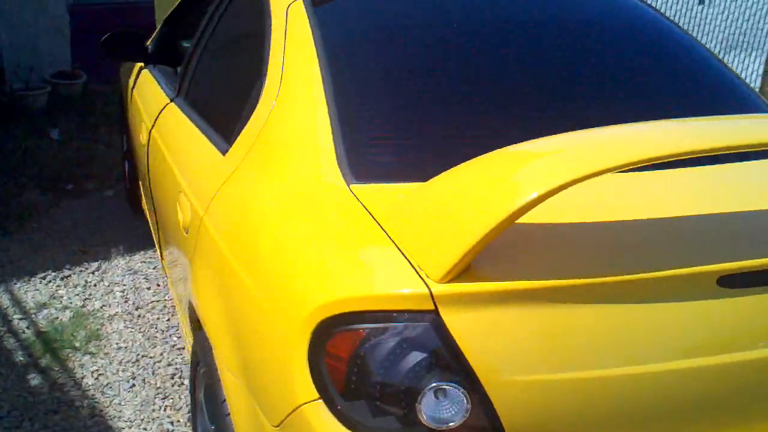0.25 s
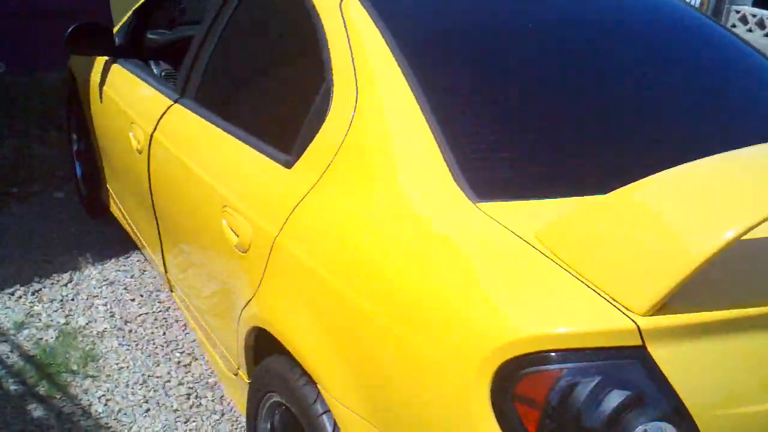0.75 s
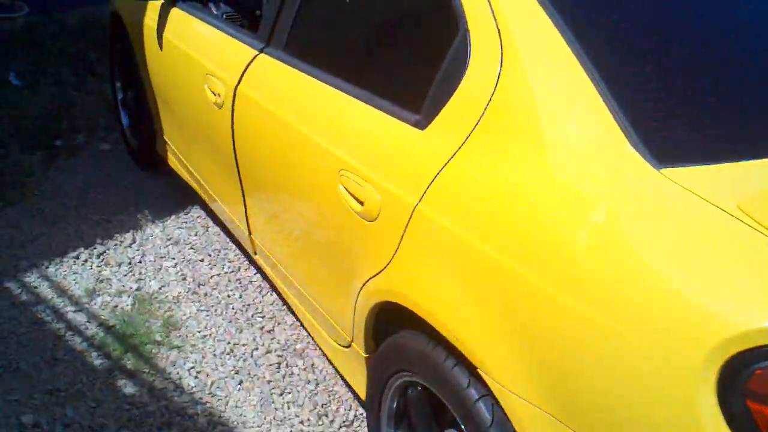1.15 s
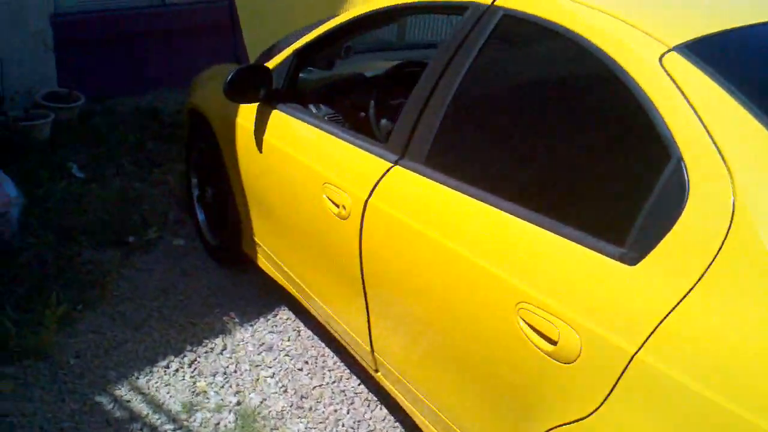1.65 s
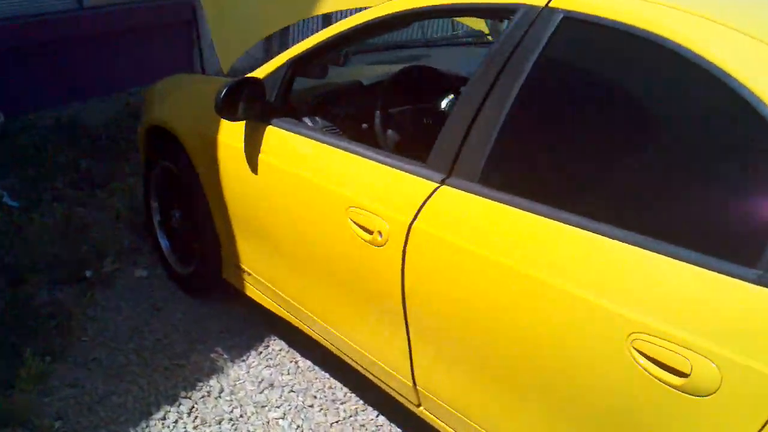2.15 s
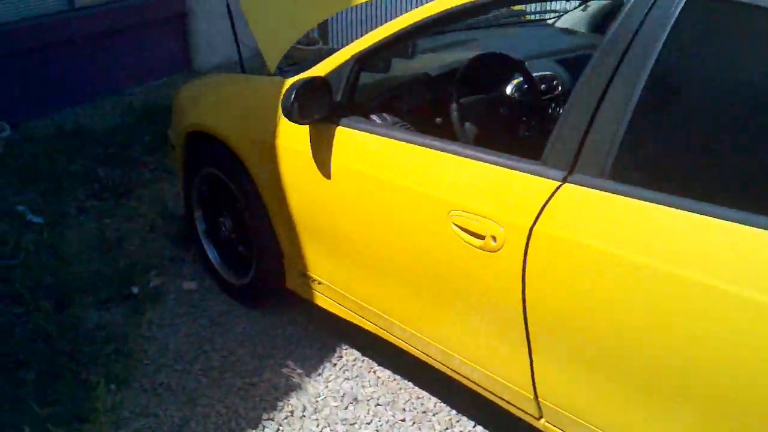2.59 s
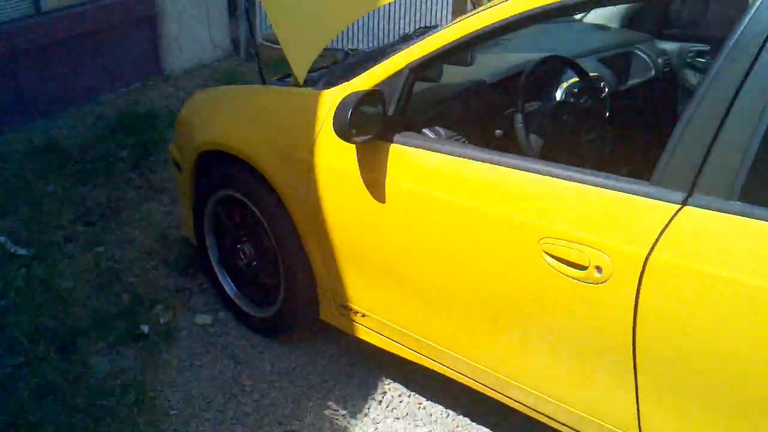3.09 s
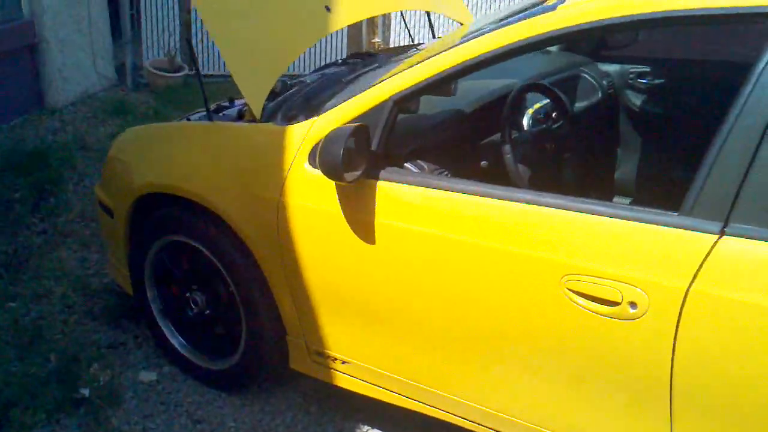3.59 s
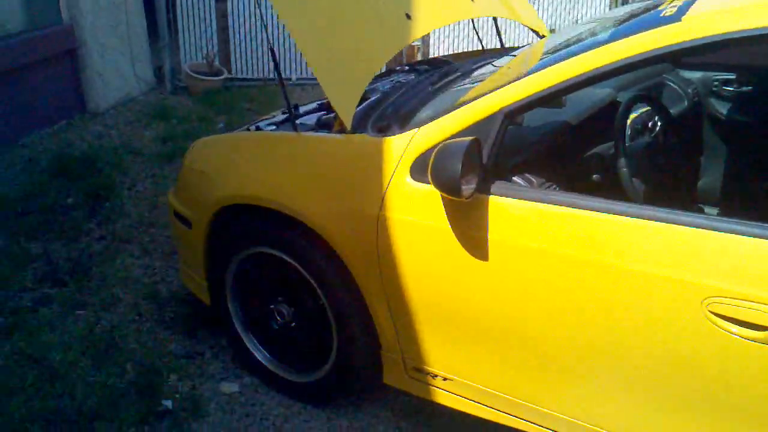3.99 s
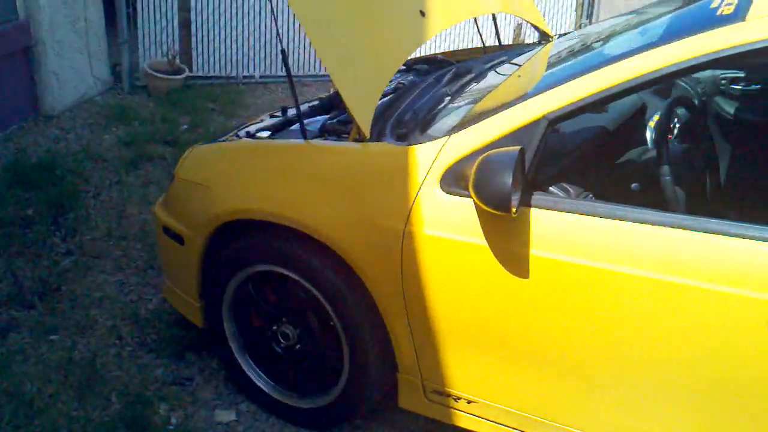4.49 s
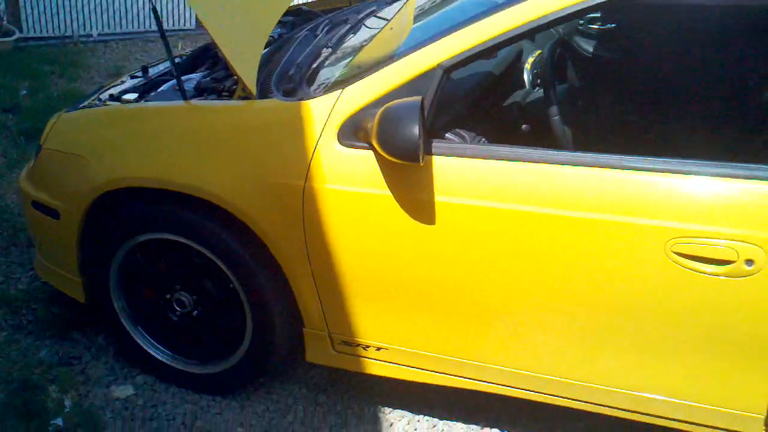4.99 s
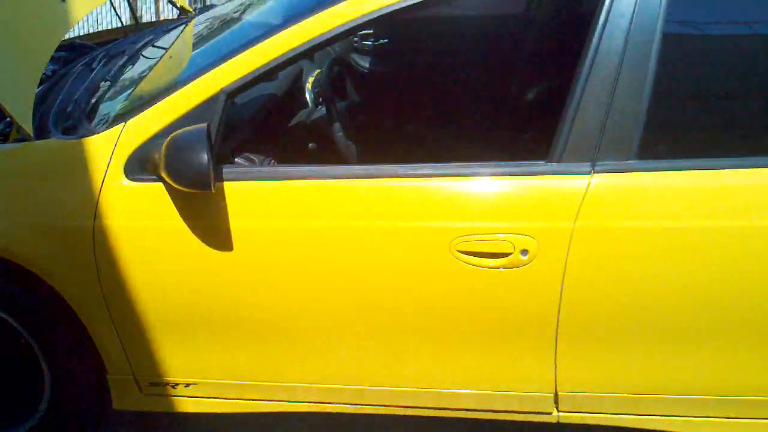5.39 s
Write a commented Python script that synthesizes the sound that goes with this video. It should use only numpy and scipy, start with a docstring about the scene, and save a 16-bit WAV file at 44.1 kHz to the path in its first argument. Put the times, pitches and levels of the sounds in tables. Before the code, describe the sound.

A turbocharged four-cylinder car idles outdoors for about 5.6 seconds, already running at the start and cut off while running. The idle lopes: around thirty quick firings a second, grouped in eights, weaken and then build to a heavy chug about every 0.27 seconds. From 0 to 1 second the microphone is behind the car, with boomy low thumps, hollow barks, raspy puffs and small hooting burbles near 0.2 and 0.5. From 1 to 2.5 seconds it moves along the side; the boom thins and hiss rises. After about 2.3 seconds the chugs gain blunt pressure snaps, strongest near 3.1, while the rasp drops away. Around 4.2 the engine bay hiss is strongest, bright and flickering with ticks and spits. From 4.6 faint burbles return, and near 5 the rasp is almost gone as the view turns partly back. Close, wide stereo with short reflections from ground and wall.

```python
"""A four-cylinder turbo engine idles with a lope: firings build up to a loud chug every eighth beat.
Each firing rings exhaust resonances with a pressure pulse and a puff of gas noise, followed by echoes.
The listener goes from behind the car towards its side, then partly back; rasp fades, engine bay hiss grows.
Ticks, spits, gas crackle, tonal burbles and pressure snaps join in.
Two close microphone ports are cross-fed through a short delay to widen the picture."""
import sys
import numpy as np
from scipy import signal
from scipy.fft import rfft, irfft, next_fast_len
from scipy.io import wavfile

SR = 44100
rng = np.random.default_rng(int(sys.argv[2]) if len(sys.argv) > 2 else 0)


def pcm_store(signal):
    """Save signal as 16-bit PCM."""
    levels = np.round(np.clip(np.atleast_2d(signal), -1, 1) * 32767)
    wavfile.write(sys.argv[1], SR, levels.astype(np.int16).T)


N = 249165

# onsets of the eight beats from chug to chug, closest around the chug: [share of the lope]
BEATS = [0, .1217, .2455, .372, .4995, .627, .7544, .8787]


def from_db(db):
    """Decibels to gain."""
    return 10 ** (np.asarray(db) / 20)


def rms_one(x):
    """Scales all rows so that the first has rms 1."""
    return x / np.sqrt(np.mean(x[0] ** 2) + 1e-20)


def in_time(rows):
    """Second column of a curve at every sample."""
    return np.interp(np.arange(N) / SR, *np.transpose(rows))


def clicks(s, sizes):
    """A click of each size at each time that falls inside the scene."""
    at = np.round(s * SR).astype(int)
    inside = (at >= 0) & (at < N)
    return np.bincount(at[inside], sizes[inside], N)


def grains(per_s, spread_db):
    """Clicks at random moments, most small, a few large."""
    sizes = from_db(spread_db * np.minimum(rng.exponential(1, N), 4))
    return sizes * (rng.random(N) < per_s / SR)


def dying(impulses, decay_s):
    """Each click adds an exponentially dying envelope that starts at the click's size."""
    return signal.lfilter([1], [1, -np.exp(-1 / (decay_s * SR))], impulses + 1e-18)


def resonance(x, hz, width_hz):
    """Two-pole peak applied twice, so that its skirts stay dark; gain 1 on top."""
    r = np.exp(-np.pi * width_hz / SR)
    g = (1 - r * r) / 2
    section = [g, 0, -g, 1, -2 * r * np.cos(2 * np.pi * hz / SR), r * r]
    return signal.sosfilt([section] * 2, x)


def coloured_noise(colour):
    """A pair of unrelated noises, coloured by the first and last level columns."""
    hz, colour = np.fft.rfftfreq(N, 1 / SR) + 1, np.array(colour)
    log_hz, log_points = np.log(hz), np.log(colour[:, 0])
    shape_db = [np.interp(log_hz, log_points, colour[:, c], left=-60) for c in (1, -1)]
    spectrum = rfft(rng.standard_normal((2, N))) * from_db(shape_db)
    return rms_one(irfft(spectrum, N))


def hiss_db(s):
    """The hiss swells with each lope and flares now and then, rising faster than it fades."""
    # engine bay hiss along the walk: [t/s, level/dB]
    bay_walk = [(0, -57.5), (0.9, -57.5), (1.5, -55), (2.3, -53.5), (2.8, -54), (3.5, -54.5), (4.2, -52),
                (4.8, -53.5), (5.65, -53)]
    # brief changes of hiss level, mostly up: [peak t/s, change/dB, fall length/s]
    flare_table = [(0.12, 8, 0.013), (0.388, 9.5, 0.011), (0.514, 6, 0.013), (0.61, 4, 0.022),
                   (0.692, 7.5, 0.012), (0.973, 6.5, 0.011), (1.167, 2.5, 0.062), (1.628, 4.5, 0.013),
                   (1.835, 6.5, 0.0076), (1.975, 2.5, 0.012), (2.478, 5.5, 0.016), (2.784, -1, 0.018),
                   (3.176, 2.5, 0.028), (3.591, 6.5, 0.015), (3.754, 3, 0.015), (3.825, 2.5, 0.018),
                   (3.928, 4, 0.027), (4.12, 3.5, 0.026), (4.268, 4, 0.017), (4.398, 6, 0.029),
                   (4.59, 2, 0.035), (4.658, 5, 0.027), (4.913, 3.5, 0.016), (5.499, 6, 0.0073)]
    swing_db, lead_lopes, rise_share = 1, 0.11, 0.38
    t = np.arange(N) / SR
    lopes = np.interp(t, s, np.arange(len(s)) / len(BEATS))
    flares_db = 0
    for top_s, change_db, fall_s in flare_table:
        length_s = np.where(t < top_s, rise_share * fall_s, fall_s)
        flares_db = flares_db + change_db * np.exp(-((t - top_s) / length_s) ** 2)
    # the swell peaks ahead of the chug
    swell_db = swing_db * np.cos(2 * np.pi * (lopes + lead_lopes))
    return in_time(bay_walk) + swell_db + flares_db


def hiss(s, rasp_db):
    """Bright noise whose bands flicker apart, loose valve gear ticks on its treble, a gas spit per firing."""
    # hiss spectrum: [f/Hz, common relative level/dB, port difference relative level/dB]
    bay_colour = [(694, 21, 14), (1000, 14, 12), (1340, 9, 13.5), (2740, 4, 4.5), (2948, 9.5, 5),
                  (3470, 1.5, 1), (5420, -1.5, -6.5), (6130, 3.5, -1.5), (8600, 6, 0.5), (10800, 5, -0.5),
                  (12000, 1, -16), (12700, -0.5, 0.5), (14200, 4.5, -9)]
    # spit spectrum: [f/Hz, relative level/dB]
    spit_colour = [(1500, -10), (2500, 16.5), (4000, -1), (5500, -4), (8000, 6), (14000, -4)]
    # borders between flickering bands: [f/Hz]
    split_hz = [2600, 5200, 7800, 10400]
    spit_db, lag_s, spit_decay_s = -29.5, .004, .005
    ticks_per_s, tick_db, firing_tick_db = 40, -8.5, -6.5   # relative to the hiss
    tick_spread_db, tick_decay_s, flicker_db = 3.5, 0.0017, 1.62

    spit = dying(clicks(s + lag_s, from_db(rasp_db + spit_db)), spit_decay_s)
    shared = rng.standard_normal(len(s))   # ties flicker to firing ticks
    firing_ticks = clicks(s + lag_s, from_db(firing_tick_db + tick_spread_db * shared))
    stray_ticks = from_db(tick_db) * grains(ticks_per_s, tick_spread_db)
    ticks = dying(firing_ticks + stray_ticks, tick_decay_s)

    t = np.arange(N) / SR
    spectrum = rfft(coloured_noise(bay_colour))
    band = np.digitize(np.fft.rfftfreq(N, 1 / SR), split_hz)
    bay = 0
    for k in range(band.max() + 1):
        drift = 0.69 * shared + 0.82 * rng.standard_normal(len(s))
        flicker = from_db(flicker_db * np.interp(t, s, drift))
        ticking = 1 + ticks * (k > 0)      # lowest band stays free of ticks
        bay = bay + flicker * ticking * irfft(spectrum * (band == k), N)
    return bay * from_db(hiss_db(s)) + coloured_noise(spit_colour) * spit


def hoots():
    """Each burble is a short tone that swells and fades as half a sine."""
    # tonal burbles between chugs: [t/s, level/dB, f/Hz]
    burbles = [(0.176, -29, 419), (0.543, -23.5, 414), (4.582, -34, 349), (5.164, -28, 420)]
    length_s = 0.03
    t, out = np.arange(N) / SR, np.zeros(N)
    for s, level_db, hz in burbles:
        swell = np.sin(np.pi * np.clip((t - s) / length_s, 0, 1))
        out += from_db(level_db) * swell * np.sin(2 * np.pi * hz * (t - s))
    return out


def crackle(s, crack_db):
    """Uneven small gas pops ring at one of six pitches, louder under strong firings."""
    per_s, level_db, spread_db = 900, -58, 3
    follows = 0.46                         # share of the firing's crack dB
    cycles, tilt_db_per_octave = 3.94, -8.5
    pitches_hz = np.geomspace(646, 1700, 6)
    sizes = grains(per_s, spread_db) * rng.choice([-1, 1], N)
    dealt = rng.integers(0, len(pitches_hz), N)
    tilt = from_db(tilt_db_per_octave * np.log2(pitches_hz / pitches_hz[0]))
    gas_pops = 0
    for k, hz in enumerate(pitches_hz):
        own = sizes * (dealt == k) + 1e-18
        gas_pops = gas_pops + tilt[k] * resonance(own, hz, hz / cycles)
    swell_db = np.interp(np.arange(N) / SR, s, follows * (crack_db - crack_db.mean()))
    return from_db(level_db + swell_db) * rms_one([gas_pops])[0]


def snaps():
    """One pressure hump each, falling faster than it rises; common part only."""
    # bare pressure snaps at the head of chugs: [t/s, level/dB]
    snap_table = [(0.4162, -25), (2.314, -14), (2.8603, -9), (3.1309, -4.5), (3.403, -10), (3.673, -10),
                  (3.946, -19), (4.2144, -10.5), (4.4847, -7.5), (4.7529, -8.5), (5.0314, -11),
                  (5.3048, -10.5), (5.5785, -12.5)]
    rise_s, fall_s = 0.00058, 0.00054      # Gaussian sigmas
    s, db = np.transpose(snap_table)
    t = np.arange(-220, 221) / SR
    hump = np.exp(-.5 * (t / np.where(t < 0, rise_s, fall_s)) ** 2)
    return np.outer([1, 0], signal.fftconvolve(clicks(s, from_db(db)), hump, "same"))


def firings():
    """Firing times and relative thump, bark, rasp and crack dB, shaped by lope, chug and walk."""
    # loudest firing of each lope: [t/s, strength/dB, sharpness/dB, added to the next two firings/dB]
    chug_table = [(0.143, 5, 3, -0.5), (0.411, 2.0, 6, 5), (0.682, 3.5, 3.5, 9), (0.954, 3.5, 4, -0.5),
                  (1.227, 1.5, 1.5, 0.5), (1.495, 3.5, 4, 3), (1.765, 3, 2.5, 0), (2.045, 3, 0.5, 0.5),
                  (2.312, 0.5, 2, 0), (2.58, -0.5, 0.5, -5), (2.856, -3.5, 4, 0), (3.125, -0.5, 3.5, -3.5),
                  (3.395, 1, 1, -20), (3.668, 0.5, 2.5, 3), (3.938, -1, 4.5, 4), (4.207, 2, 3, -1.5),
                  (4.479, 2.5, 1.5, -1.5), (4.747, 3.5, 2, 0), (5.026, 2.5, 1, 3), (5.299, 3.5, -3, -1.5),
                  (5.567, 6.5, -3.5, -2.5)]
    # strength of each beat: [thump/dB, bark/dB, rasp/dB, crack/dB]
    lope_table = [(7, -1, 8, 4), (-5.5, -4.5, -12, -11.5), (-8, -11.5, -15, -17), (-2.5, -18, -15, -15.5),
                  (-8.5, -17, -13, -30), (-3.5, -11.5, 3.5, -11.5), (1.5, -7.5, 7.5, -5.5),
                  (4.5, -0.8, 9, -4)]
    # firings between chugs, mostly the three building up to each:
    # [t/s, added to thump and bark/dB, added to crack/dB, added to rasp/dB]
    pop_table = [(0.042, 1.5, -15, 2), (0.076, 0, -4.5, 2), (0.111, -1, 2, 3), (0.278, 4, -7, 13),
                 (0.312, 5, 2, 1.5), (0.347, 3.5, 0.5, -3.5), (0.38, 7.5, 5.5, -2), (0.579, 3, 4.5, 3.5),
                 (0.616, -1, 2.5, 1), (0.652, 1, -3, -2.5), (0.786, -4, 5, -4), (0.854, 0.5, -11, -4),
                 (0.888, -2.5, -3.5, -3), (0.921, 0, -6, -5.5), (1.126, -1, -1, 1), (1.159, -0.5, 2, 0),
                 (1.194, 3, 5, 6.5), (1.395, 4, 2.5, 3), (1.428, 1, 2.5, 0), (1.461, 2.5, 7, 0),
                 (1.594, 2, 5.5, 18), (1.632, 3, 15, -7), (1.664, 1.5, 4, -1), (1.699, 1, -3, -2),
                 (1.73, -2, 3.5, -2), (1.941, 1.5, 0, -1), (1.975, 0.5, -1, -3), (2.011, -2.5, 3, -1),
                 (2.212, 5, 5, 3.5), (2.246, -0.5, 2, -8), (2.28, 4.5, 3.5, 3.5), (2.447, 8.5, 6, 2),
                 (2.48, -5, 7.5, 6), (2.514, 4, 3.5, 3), (2.548, 2.5, -2, -4), (2.753, 2, -2, -4),
                 (2.787, 2, 0, -10), (2.822, 2, 2.5, 3), (3.025, 2, 2, 0), (3.059, 2.5, -1.5, 7),
                 (3.092, 0, 1.5, -17), (3.294, 1.5, 1.5, -2), (3.33, -4, -2.5, 5), (3.362, 1.5, 0.5, 10),
                 (3.566, 1, 0, 4), (3.6, -2, -1, -3), (3.635, -1.5, -1.5, -1), (3.837, 3.5, 2.5, 1),
                 (3.871, 1, -2, 1), (3.905, 4.5, -2, 0), (4.107, 4, 3, -8), (4.141, 2, -8, 12),
                 (4.174, 1.5, 1.5, 6.5), (4.378, 4, 7.5, -14), (4.412, -1, 2, 12), (4.446, -1, -2, 8),
                 (4.579, 1.5, 12.5, 5.5), (4.612, 9.5, 2, 3.5), (4.649, 0.5, 1, 2.0), (4.682, 2, 1.5, -4),
                 (4.715, 1.5, 2.5, 5), (4.922, 1, -14, -5.5), (4.958, -3.5, -13, -1), (4.992, 1, -6, 5),
                 (5.197, 1, 14.5, -3), (5.232, -1.5, 3.5, 1.0), (5.266, -0.5, 6, 4), (5.466, -2, -13, -1.5),
                 (5.5, -3, -10, -8), (5.533, 1, -5, -5)]
    # exhaust along the walk: [t/s, thump relative level/dB, rasp relative level/dB, crack relative level/dB]
    tailpipe = [(0, -29, -38.5, -16), (0.45, -37, -33, -21), (0.9, -29.5, -34.5, -15),
                (1.35, -34, -40.5, -20.5), (1.8, -34, -36.5, -21), (2.3, -33.5, -37, -21),
                (2.9, -31, -51.5, -22.5), (3.6, -31, -47, -23.5), (4.3, -31, -49, -21),
                (4.9, -34.5, -64, -27), (5.65, -32.5, -65, -22.5)]
    thump_follows, edge_follows = 0.08, 0.98   # share of chug strength in thump; in crack and rasp
    uneven_db = 1.5                            # scatter of firings between chugs

    chugs, lope, beats, pops = (np.array(x) for x in (chug_table, lope_table, BEATS, pop_table))
    span_s = np.diff(chugs[:, 0]).mean()
    starts = np.r_[chugs[0, 0] - span_s, chugs[:, 0], chugs[-1, 0] + span_s]
    rows = np.vstack([chugs[0], chugs, chugs[-1]])
    s = starts[:-1, None] + np.diff(starts)[:, None] * beats
    extra = uneven_db * rng.standard_normal(s.shape) * (beats > 0)
    extra[:, 1:3] += rows[:-1, 3:]

    late = np.clip(2 * beats - .5, 0, 1)   # the build-up belongs to the coming chug
    strength, sharp = (rows[:-1, c, None] * (1 - late) + rows[1:, c, None] * late for c in (1, 2))
    when, *walk = np.transpose(tailpipe)
    thump_db, rasp_db, crack_db = (np.interp(s, when, db) for db in walk)
    edge = edge_follows * strength + sharp
    levels = np.array([thump_db + thump_follows * strength, strength, rasp_db + edge, crack_db + edge])
    levels = levels + lope.T[:, None]

    s, extra = s.ravel(), np.tile(extra.ravel(), (len(levels), 1))
    nearest = np.abs(s - pops[:, :1]).argmin(axis=1)   # a listed pop takes the place of its beat
    s[nearest] = pops[:, 0]
    extra[:, nearest] = pops[:, [1, 1, 3, 2]].T
    return s, levels.reshape(extra.shape) + extra


def arriving(pair, column):
    """A lead at the left port adds the slope of the common sound to the port difference."""
    # left port's lead over the right: [t/s, thump/samples, bark/samples, crack/samples]
    lead_table = [(0.301, 11.5, 1.5, 4), (1.099, 4.5, 1, -0.5), (1.801, -7, 4, -1.5), (2.5, 1, 1, 3.5),
                  (3.2, 8, -3.5, -0.5), (3.9, 4, -4, -1.5), (4.6, 4, -4.5, -2), (5.4, 9, -2, -4)]
    lead = in_time(np.array(lead_table)[:, [0, column]])
    return pair - np.outer([0, .5], lead * np.gradient(pair[0]))


def exhaust(s, levels_db, modes, rms_db, echo_db, rough, lag_s, decay_s, flow_db, scatter_db):
    """Pressure pulse and gas puff per firing ring the pipe; rows: common part, port difference.

    rough: gas noise share; lag_s: delay through the pipe; decay_s: puff; flow_db: steady gas flow;
    scatter_db: from firing to firing; echo_db: added to echoes.
    """
    # listener's place: [t/s, 0 behind the car - 1 beside it]
    walk_table = [(0, 0.22), (1.0, 0.37), (1.8, 0.57), (2.6, 0.872), (5.65, 0.51)]
    # direct sound, ground, car side, wall, two round trips in the pipe: [delay behind/s, delay beside/s]
    arrivals = [(0, 0), (.0022, .004), (.0062, 0.011), (.022, 0.019), (.0306, .0306), (.0612, 0.059)]
    # the same arrivals: [common behind/dB, common beside/dB, port difference behind/dB, beside/dB]
    path_levels = [(-12.5, -5, -25, -6), (-11, -11.5, -32, -9.5), (-17, -5.5, -25.5, -11.5),
                   (-21.5, -14.5, -26, -10), (-19.5, -10.5, -30, -10), (-24, -16.5, -44, -15)]
    walk, here = in_time(walk_table), np.interp(s, *np.transpose(walk_table))
    paths = np.hstack([arrivals, path_levels])
    delay_s, common_db, apart_db = (
        paths[:, c, None] * (1 - here) + paths[:, c + 1, None] * here for c in (0, 2, 4))
    common_db[1:] += echo_db
    arrive_s = (s + lag_s + delay_s).ravel()
    size = from_db(levels_db - levels_db.max())
    noise = rng.standard_normal((2, N)) / np.sqrt(decay_s * SR / 2)
    out = np.zeros((2, N))
    for k, (hz, width_hz, behind_db, beside_db, ports_db) in enumerate(modes):
        blow = size * from_db(scatter_db * rng.standard_normal(len(s)))
        pulse = np.array([clicks(arrive_s, (blow * from_db(db)).ravel()) for db in (common_db, apart_db)])
        puff = dying(pulse[0], decay_s) + from_db(flow_db)
        common_gain = from_db(behind_db + walk * (beside_db - behind_db))
        gain = np.array([common_gain, np.full(N, from_db(ports_db))])
        drive = gain * ((1 - rough) * pulse + rough * puff * noise)
        out += (-1) ** k * resonance(drive, hz, width_hz)   # neighbours in opposite phase
    return from_db(rms_db) * rms_one(out)


def rasp(s, rasp_db):
    """Broad high resonances blown by short, noisy puffs."""
    # resonances: [f/Hz, one-pass width/Hz, behind/dB, beside/dB, port difference/dB], relative levels
    modes = [(903, 290, -39.5, -31.5, -39), (1102, 83, -33.5, -45, -41), (1210, 107, -26, -37, -44),
             (1278, 114, -43, -30, -44), (1676, 180, -29, -68, -37), (2030, 670, -35, -70, -50.5),
             (3510, 3000, -65.5, -69, -66)]
    return exhaust(s, rasp_db, modes, rms_db=-55, echo_db=-4.5,
                   rough=.25, lag_s=.003, decay_s=.0025, flow_db=-32, scatter_db=1.5)


def crack(s, crack_db):
    """Mid resonances struck by each firing, plus the bare snaps."""
    # resonances: [f/Hz, one-pass width/Hz, behind/dB, beside/dB, port difference/dB], relative levels
    modes = [(277, 259, -21.5, -15, -25.5), (408, 191, -23, -11, -29), (501.6, 105.5, -13, -16.5, -25.5),
             (616, 156, -31.5, -26.5, -35.5), (701, 160, -40.5, -29, -38), (809, 117, -51.5, -30.5, -51)]
    rung = exhaust(s, crack_db, modes, rms_db=-33, echo_db=-2.3,
                   rough=.09, lag_s=.0015, decay_s=.004, flow_db=-24, scatter_db=1)
    return arriving(rung + snaps(), column=3)


def bark(s, bark_db):
    """Low-mid resonances struck by each firing."""
    # resonances: [f/Hz, one-pass width/Hz, behind/dB, beside/dB, port difference/dB], relative levels
    modes = [(164.2, 44.3, -6, -5.5, -14), (203.6, 32, 5.5, -3.5, -22), (251.43, 51.4, -13, 2, -17),
             (300.8, 20, -25.5, -1, -21), (333.2, 24, -5.5, -1, -21), (345, 91.5, -9.5, -3.5, -24),
             (361.9, 37, -11.5, 2.5, -13), (403, 18.6, -6, -7.5, -24)]
    rung = exhaust(s, bark_db, modes, rms_db=-26, echo_db=-4.5,
                   rough=.07, lag_s=.0015, decay_s=.008, flow_db=-16, scatter_db=1)
    return arriving(rung, column=2)


def thump(s, thump_db):
    """Lowest resonances, with narrow boom tones that swell and sink along the walk."""
    # resonances: [f/Hz, one-pass width/Hz, behind/dB, beside/dB, port difference/dB], relative levels
    thump_modes = [(48.6, 51, 3, 5, -42), (92, 76, 7, -0.5, -10.5), (133.7, 66, 14, -0.5, -55)]
    # narrow boom resonances: [f/Hz, one-pass width/Hz, behind/dB, beside/dB, port difference/dB], relative
    boom_modes = [(61.7, 18, -12, -1, -18), (93.06, 14, 8.5, 1, -15)]
    # boom along the walk: [t/s, relative level added to the thump/dB]
    boom_walk = [(0, 4), (0.6, 4), (1.2, -3), (1.8, -5), (2.3, -2), (2.9, 2), (3.4, 2.5), (4.0, -3),
                 (4.6, -6), (5.1, -3), (5.65, 7)]
    gas = dict(rough=.03, lag_s=.001, decay_s=.012, flow_db=-20, scatter_db=1)
    boom_db = thump_db + np.interp(s, *np.transpose(boom_walk))
    deep = exhaust(s, thump_db, thump_modes, rms_db=-25.5, echo_db=-.1, **gas)
    boom = exhaust(s, boom_db, boom_modes, rms_db=-35.5, echo_db=-1, **gas)
    return arriving(deep + boom, column=1)


def scene():
    """Both microphone ports: the common sound minus and plus what differs."""
    s, (thump_db, bark_db, rasp_db, crack_db) = firings()
    pipe = thump(s, thump_db) + bark(s, bark_db) + crack(s, crack_db) + rasp(s, rasp_db)
    common, apart = pipe + hiss(s, rasp_db)
    common = common + hoots() + crackle(s, crack_db)
    return np.array([common - apart, common + apart])


def record(dry):
    """Each port loses a delayed copy of the other, combing mid and side in turn; both ends are cut."""
    lag_samples, dull_hz, treble_share = 17, 4240, 0.32
    low_cut_hz, high_cut_hz = 44, 13950
    mid, side = (dry[0] + dry[1]) / 2, (dry[0] - dry[1]) / 2
    size = next_fast_len(N + SR // 10)
    hz = np.fft.rfftfreq(size, 1 / SR)
    lag = np.exp(-2j * np.pi * hz * lag_samples / SR)
    share = treble_share + (1 - treble_share) / (1 + (hz / dull_hz) ** 10)   # shallower mid notches in treble
    mid = irfft(rfft(mid, size) * (1 - share * lag), size)[:N]
    side = irfft(rfft(side, size) * (1 + lag), size)[:N]
    low_cut = signal.butter(6, low_cut_hz, "high", fs=SR, output="sos")
    high_cut = signal.ellip(16, .3, 85, high_cut_hz, fs=SR, output="sos")
    return signal.sosfilt(high_cut, signal.sosfilt(low_cut, [mid + side, mid - side]))


dry = scene()
out = record(dry)
pcm_store(out)
```